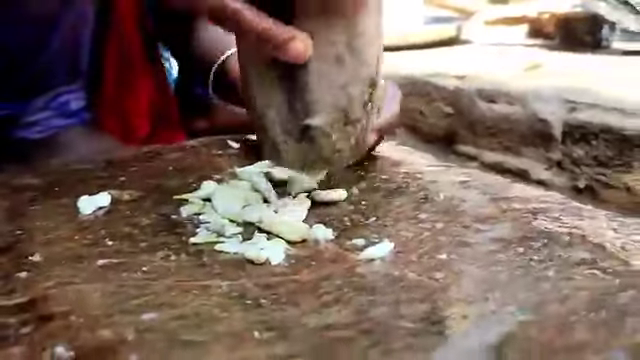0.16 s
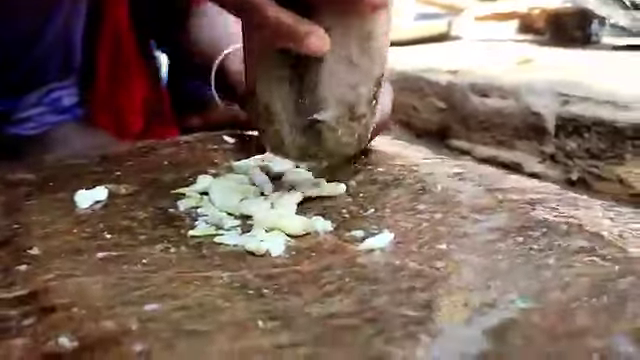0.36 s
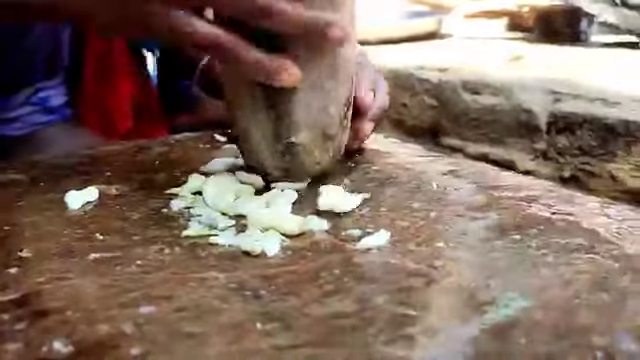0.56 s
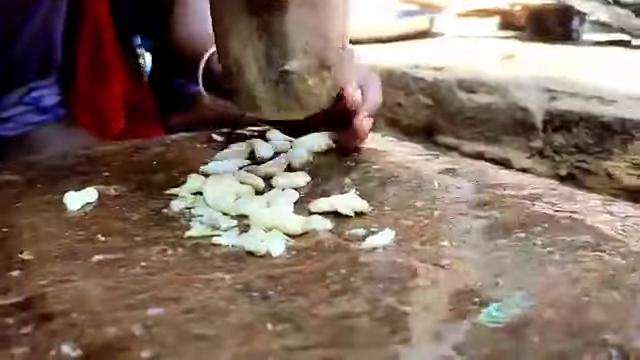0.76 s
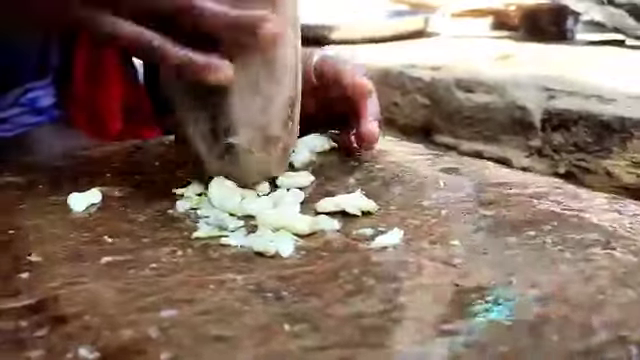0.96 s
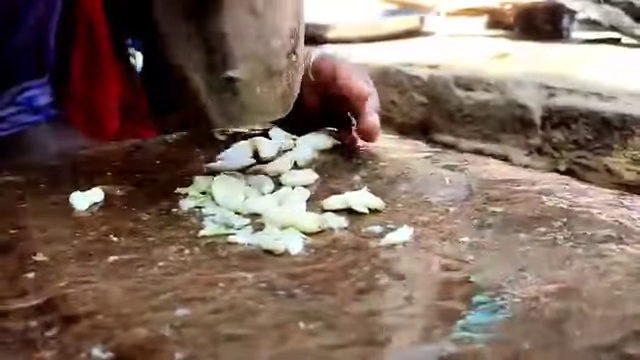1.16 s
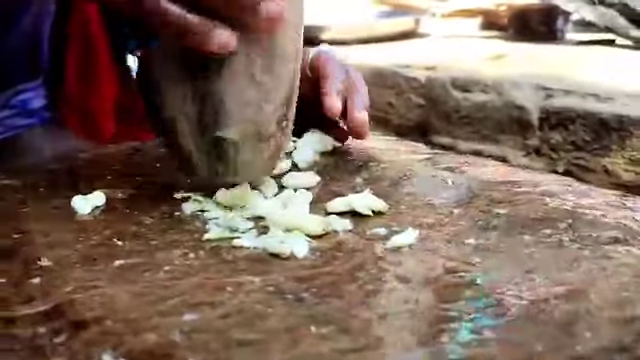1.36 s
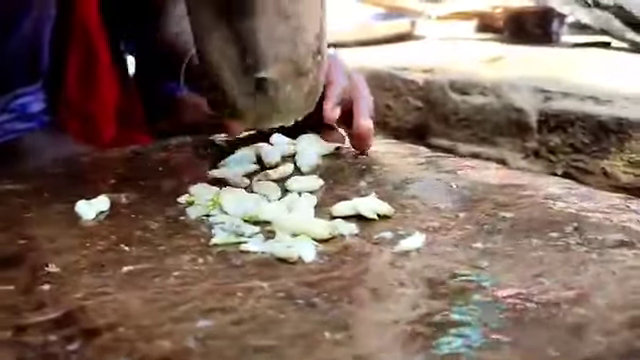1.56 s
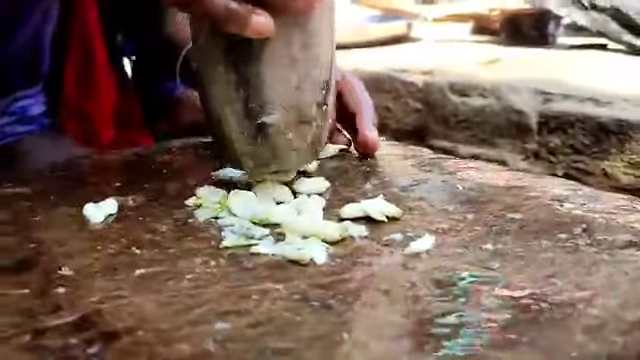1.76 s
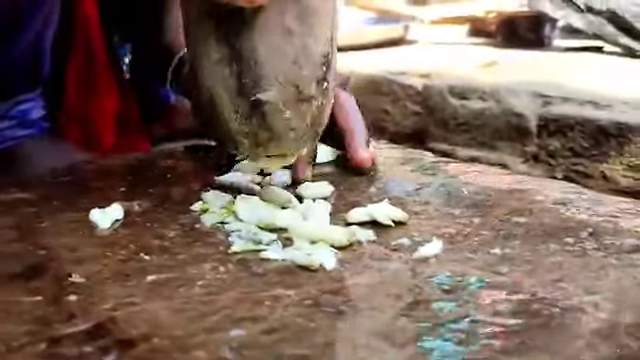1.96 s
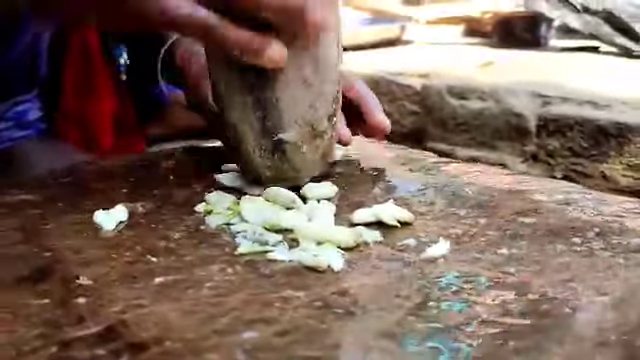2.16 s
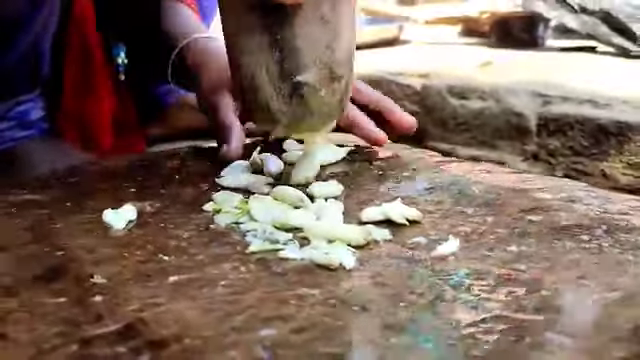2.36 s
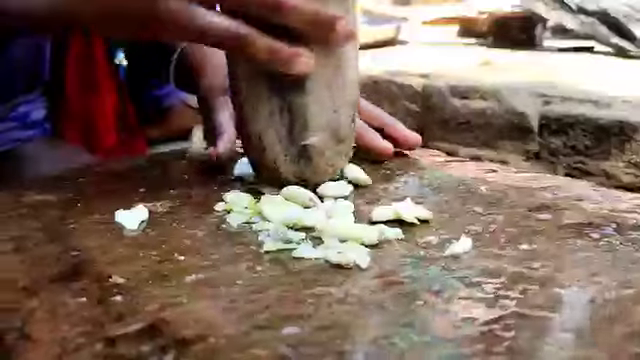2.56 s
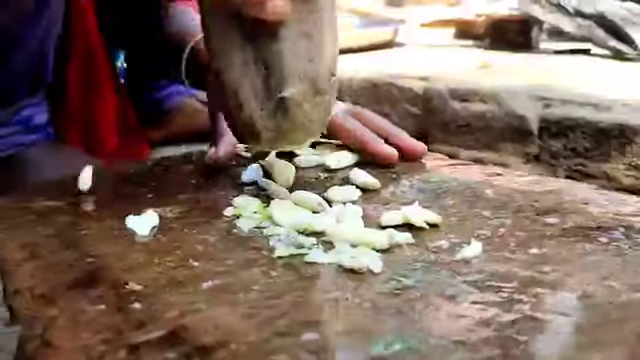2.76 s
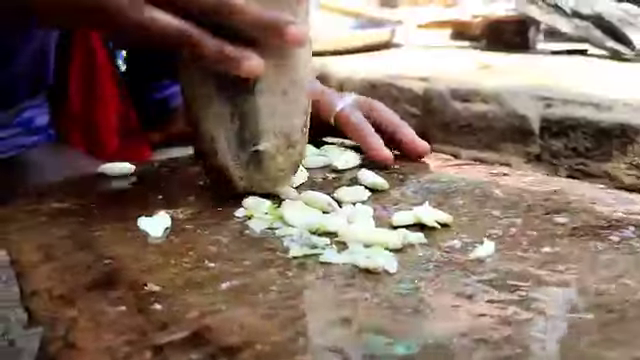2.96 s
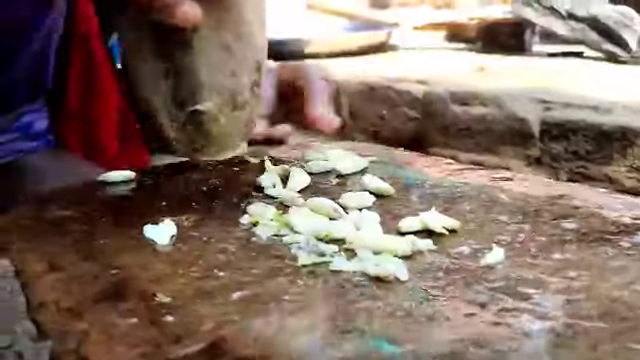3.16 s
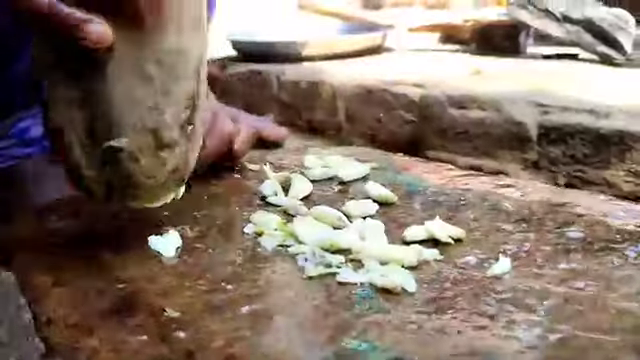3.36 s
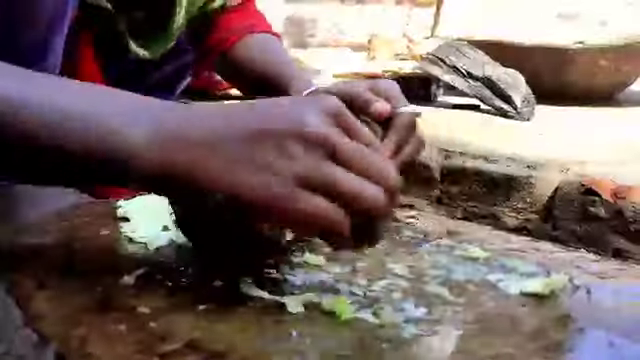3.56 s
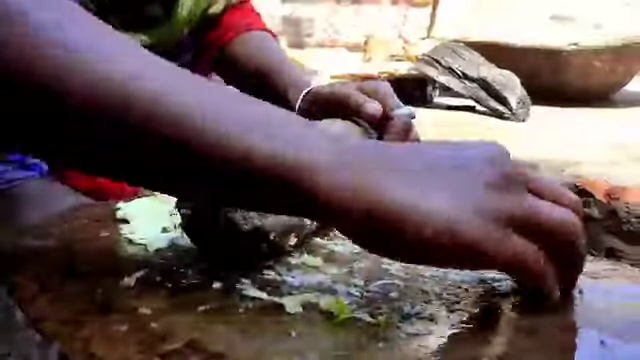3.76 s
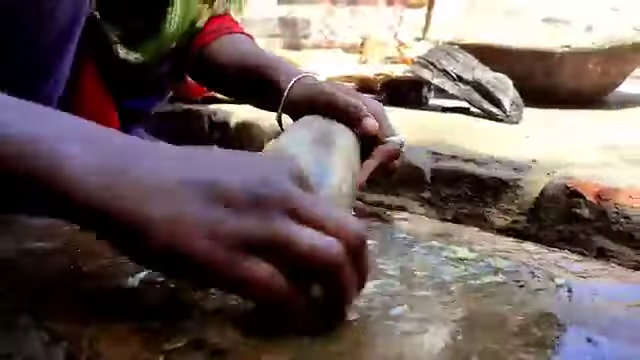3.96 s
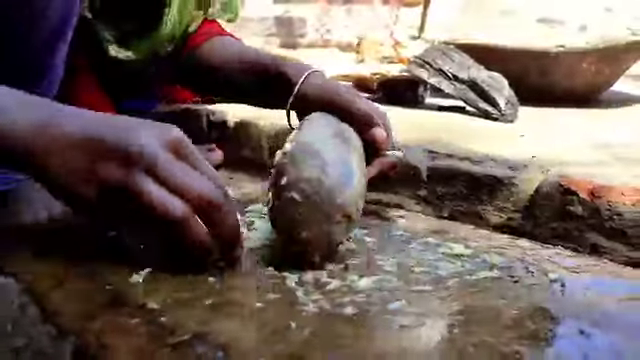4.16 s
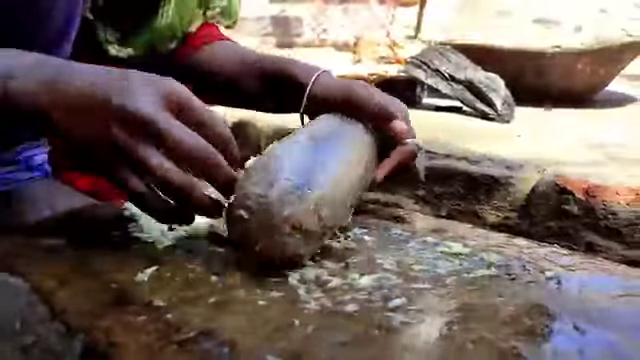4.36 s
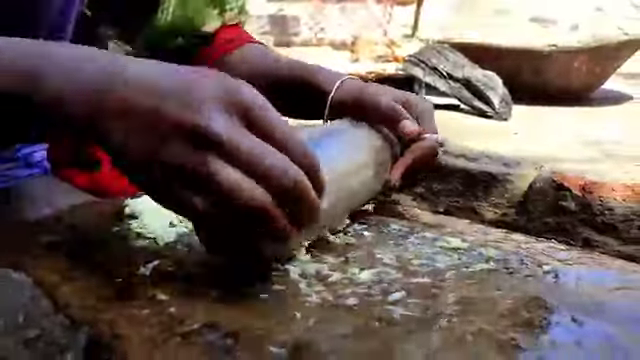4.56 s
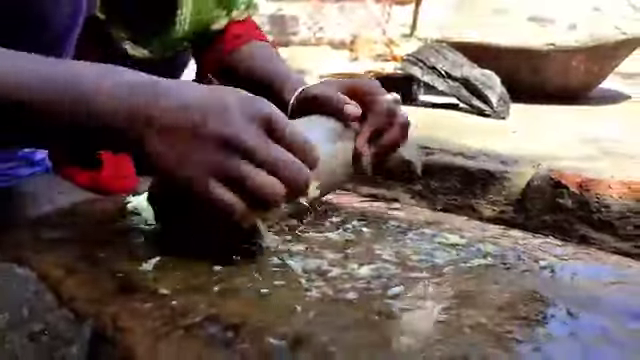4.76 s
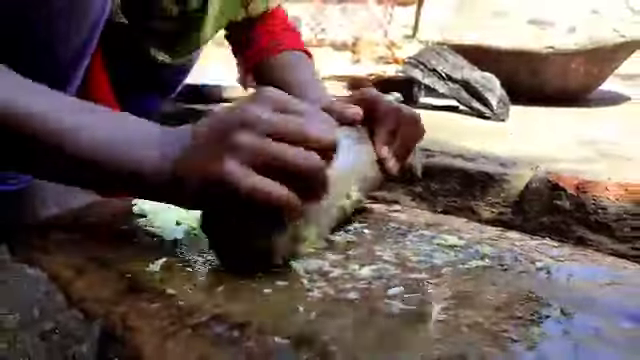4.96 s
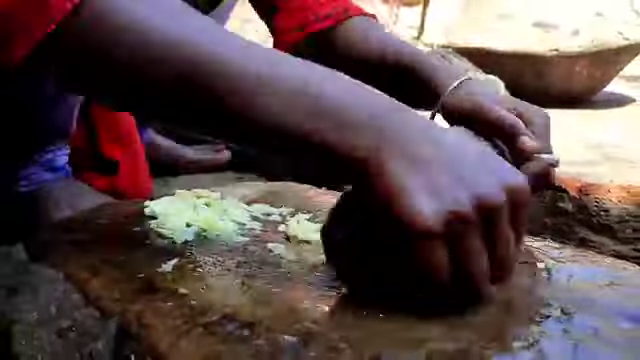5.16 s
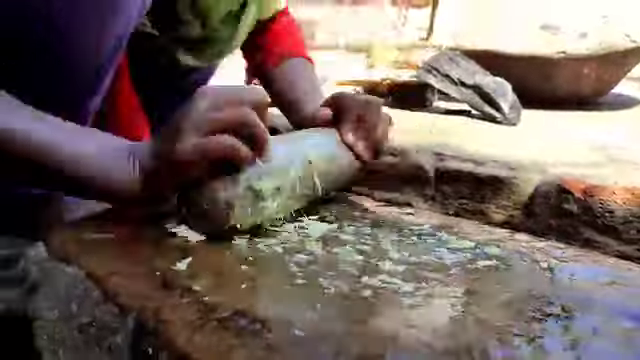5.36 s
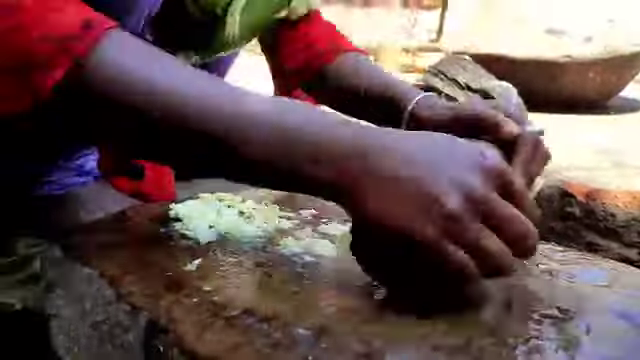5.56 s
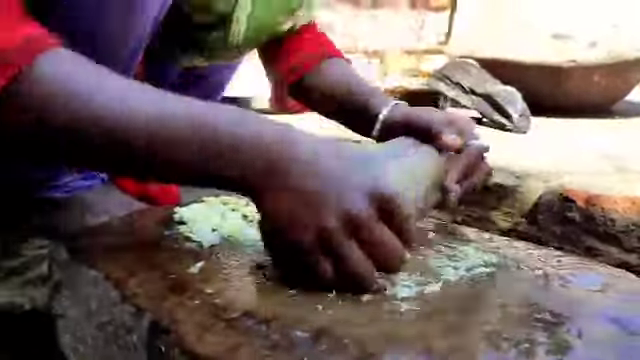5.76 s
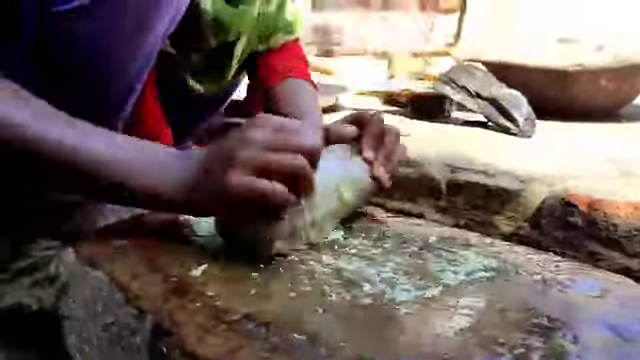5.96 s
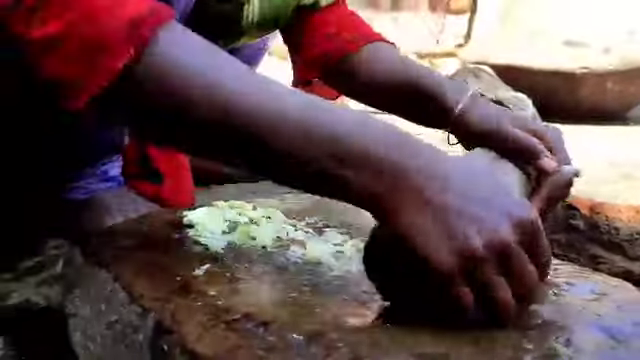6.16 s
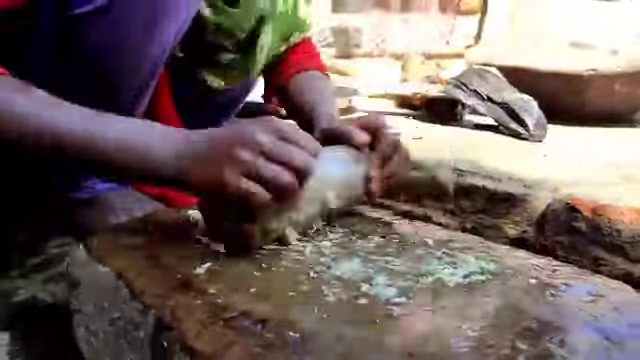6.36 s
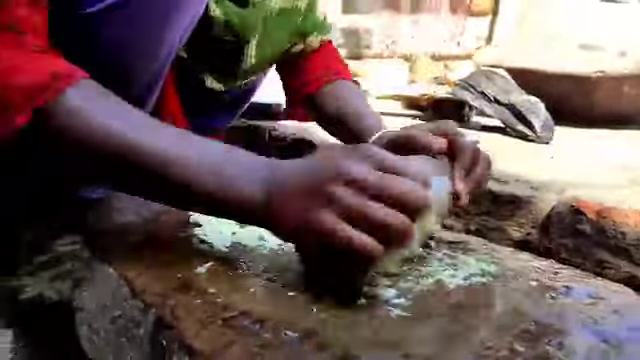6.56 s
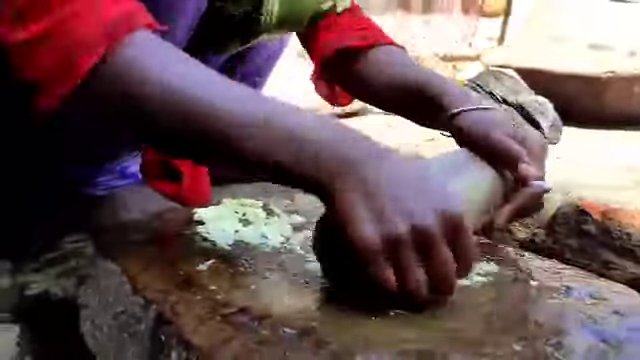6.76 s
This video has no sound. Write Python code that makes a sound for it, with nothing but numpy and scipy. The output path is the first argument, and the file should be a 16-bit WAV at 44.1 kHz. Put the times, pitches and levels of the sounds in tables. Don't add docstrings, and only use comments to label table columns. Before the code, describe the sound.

Nine blows crush garlic on a stone slab: fibres snap sharply, juice squirts, the slab gives a soft low thud. A quieter spell follows, with small scuffs, wet smears and fingers sweeping pulp. From about five seconds the roller clacks hard and briefly rings, each clack leading into a coarse hissing push and lighter pull. Close stereo pickup outdoors, faint wind and one tiny far chirp.

```python
import sys
import numpy as np
from scipy import signal
from scipy.fft import rfft, irfft, next_fast_len
from scipy.io import wavfile

SR = 44100
rng = np.random.default_rng(int(sys.argv[2]) if len(sys.argv) > 2 else 0)


def log_audio(samples):
    frames = np.atleast_2d(samples).T
    limited = np.clip(frames, -1, 1)
    pcm = np.round(limited * 32767).astype(np.int16)
    wavfile.write(sys.argv[1], SR, pcm)


def volts_from_db(level):
    exponent = np.asarray(level, float) / 20
    return 10 ** exponent


N = 300321

# time in seconds, level in dB, left over right in dB.
WIND = [
    (0.0, -56.5, 11),
    (1.29, -63, 3.5),
    (2.07, -66, 9.5),
    (2.29, -64, 11),
    (2.69, -66, -0.5),
    (3.17, -67.5, 3),
    (3.57, -63.5, 1),
    (4.59, -66.5, 8.0),
    (5.73, -68, -0.5),
    (6.81, -68, 12.5),
]
# time in seconds, pitch in Hz, level in dB.
BIRD = [
    (1.293, 5510, -92),
    (1.302, 5000, -72.5),
    (1.318, 4090, -74.5),
    (1.335, 3700, -84),
    (1.35, 3600, -78),
]
# frequency in Hz, density in dB per Hz.
YARD_SPECTRUM = [(29, -31), (50, -1), (174, -14.5), (367, -18.5), (413, -24), (455, -18.5), (578, -22.5),
                 (1080, -27.5), (1160, -27), (1740, -28), (5660, -37), (12500, -42), (14200, -40),
                 (14600, -66.5)]
YARD_DB = -66.5
SWAY_DB = 1.5
PORT_LAG = 4

# start in seconds, peak in dB, crackle centre in Hz,
# mid share in dB, mid centre in Hz.
BURSTS = [(0.0172, -13.5, 7560, -12.5, 3500), (0.3417, -15, 7500, -15, 2430), (0.605, -47, 4490, 6, 1500),
          (0.6648, -16, 7200, -18.5, 2520), (1.0884, -17, 6950, -19.5, 1290),
          (1.43, -11.5, 6086, -18, 2200), (1.771, -15.5, 7120, -9, 3440),
          (2.3131, -25.5, 7100, -12.5, 3840), (2.6681, -10.5, 6760, -16.5, 2320),
          (3.03, -24.5, 6770, -17, 3330), (3.0355, -27, 7100, -2.5, 2756)]
BURST_MS, LONGER_MS_PER_DB = 2.15, 0.11
# start in seconds, peak in dB, mid share in dB, mid centre in Hz.
GIVES = [(0.0176, -20, -8.5, 2280), (0.042, -43, -29, 1830), (0.0474, -35.5, -24, 2920),
         (0.3465, -15.5, -14, 4500), (0.352, -26.5, -11.5, 3720), (0.3703, -30.5, -27, 2450),
         (0.376, -36, -20, 3850), (0.6677, -26, 8.5, 3650), (0.6632, -22.5, -2, 2300),
         (1.086, -36, -24.5, 3600), (1.4321, -31, -1.5, 1505), (1.4742, -40, -18, 2190),
         (1.784, -40.5, -11, 3880), (2.3061, -31.5, -15, 2230), (2.3178, -36, -4, 3000),
         (2.349, -58, -19, 3000), (1.131, -44, -7, 2520), (3.0417, -35, -10, 4000),
         (2.6707, -19, -17, 1630)]
CRACKLE_HZ, GIVE_MS = 7100, 2.5
# start in seconds, peak in dB.
SKINS = [
    (0.74, -59),
    (2.298, -42),
]
# start in seconds, peak in dB.
TICKS = [(0.1535, -72), (0.4194, -64), (0.4304, -61), (0.439, -54.5), (0.4484, -63), (0.455, -60.5),
         (0.4823, -66), (0.7275, -64), (0.7374, -62), (1.918, -60), (2.0138, -70), (2.379, -75),
         (2.81, -60.5)]
# start in seconds, peak in dB.
SNAPS = [(3.52, -40), (4.487, -45), (4.5223, -47.5), (4.578, -50.5), (4.7094, -52), (4.7252, -58),
         (4.7436, -56), (4.7615, -51.5), (4.7915, -55), (4.8384, -54.5), (5.05, -32.5), (5.3917, -42),
         (5.438, -46.5), (5.485, -55.5), (5.4981, -52), (5.5301, -43.5), (5.855, -44), (5.9962, -46.5),
         (6.0736, -46), (6.1712, -42), (5.9017, -44.5), (6.39, -47), (6.4959, -56.5), (6.5868, -50),
         (5.5434, -45.5), (5.5888, -59), (6.0496, -50), (6.3235, -70.5), (6.3463, -54), (6.6053, -44),
         (5.4642, -51), (5.3036, -57), (6.7424, -41), (6.763, -46), (3.637, -53), (3.648, -54.5),
         (4.402, -64.5), (4.498, -50.5), (4.536, -54), (5.375, -51)]
# start in seconds, peak in dB, mid share in dB,
# mid centre in Hz, length in ms.
CRUNCHES = [(.676, -40.5, -14.5, 4000, 2), (0.68, -36, 7, 3580, 7.7), (1.119, -37, -6.5, 6000, 5),
            (.372, -43.5, -2.5, 3490, 5), (1.4625, -46, -3.5, 3005, 6), (2.75, -39, -4, 4500, 9),
            (.40, -57, 2.5, 4500, 7), (0.69, -51, 4, 3985, 5.9), (1.1, -47.5, -6, 7000, 5.5),
            (1.15, -63, 4, 4500, 7.8), (1.45, -46, -3.5, 4000, 5), (3.036, -26.5, 3.5, 11000, 3),
            (.358, -39.5, -0.5, 4500, 6), (0.43, -50.5, 4, 4500, 9), (.70, -46.5, 4.5, 4200, 8)]
# frequency in Hz, density in dB per Hz.
SPLIT_SPECTRUM = [(1470, -53.5), (2500, -23.5), (3140, -21), (4140, -11.5), (5200, -7), (6850, -3),
                  (8230, -10.5), (13400, -15), (14600, -22), (15500, -50)]
# start in seconds, fizz in dB, hold in seconds,
# seeping tail in dB, coarse crunch in dB.
JUICE = [
    (0.027, -64.5, 0.029, -15, -7),
    (0.349, -69.5, 0.018, 5, -14.5),
    (0.675, -66, 0.029, -8.5, -17),
    (1.093, -64, 0.042, -16, -13),
    (1.439, -63.5, 0.042, -23, -13.5),
    (1.776, -67.5, 0.016, -14.5, -2.5),
    (2.313, -70.5, 0.045, -20, -4.5),
    (2.675, -65, 0.04, -9, -8),
    (3.039, -66.5, 0.037, -15, -9),
]
# frequency in Hz, density in dB per Hz.
FIZZ_SPECTRUM = [(530, -47), (900, -24), (3850, -8.5), (5120, -1), (5630, -8), (6900, -6.5), (9070, -22),
                 (13900, -13.5), (14600, -21.5), (15500, -56.5)]
CRUSH_DB_PER_S = 1299
SPRAY_DB, SPRAY_DB_PER_S, DRAIN_DB_PER_S, SEEP_DB_PER_S = 14.5, 2199.5, 703, 111
SWELL_DB_PER_S = 199
# start in seconds, rise in seconds, fall in seconds,
# level in dB, loss during the fall in dB.
PEELS = [
    (.06, .04, .03, -72, 2),
    (1.875, .05, .11, -75, 2),
    (2.32, .02, .08, -74, 8),
]

# start in seconds, peak in dB, frequency in Hz, t60 in seconds, left over right in dB.
PINGS = [(0.343, -53, 500, 0.031, 0), (.664, -30.5, 2260, 0.018, 9.5), (.666, -28.5, 3630, .02, 5),
         (1.09, -51, 520, 0.028, -4), (1.432, -45.5, 600, 0.03, 11.5), (1.432, -42.5, 1470, 0.028, 9.5),
         (1.773, -37, 8760, .008, 5), (2.669, -40, 610, 0.0254, -1), (2.667, -25, 4600, 0.011, 5.5),
         (2.669, -51.5, 1263, 0.046, 0), (2.812, -54.5, 1550, 0.023, 2.5), (3.676, -59, 420, 0.038, -3),
         (4.962, -30, 1900, 0.014, 0), (6.4972, -36.5, 2700, 0.0097, 0), (.465, -60, 5600, .006, -7),
         (.516, -62, 7400, .005, -5), (.6645, -21, 7800, 0.0063, -7), (1.09, -46, 1240, 0.019, -3),
         (5.052, -33, 7170, 0.02, -12.5), (.018, -41, 1260, 0.032, 0), (5.988, -43, 3580, .012, 0),
         (5.1, -43, 930, 0.014, 0), (.684, -43, 4650, .03, -3), (.669, -36, 4700, .01, 0),
         (6, -58, 3600, .008, 0), (5.487, -40, 2870, 0.015, 0), (5.499, -41, 4100, 0.0056, 0),
         (5.592, -42, 3900, .012, 0), (2.7, -59.5, 445, 0.057, 0), (1.1, -64.5, 404, .08, 0),
         (3.14, -62, 430, 0.085, 0), (2.669, -39, 2400, 0.017, 0)]

# start in seconds, peak in dB, push in ms,
# deep ring in dB, upper rings in dB.
THUMPS = [
    (0.020, -40.5, 8, -9, -4.5),
    (0.349, -41.5, 8.5, -10, -8),
    (0.668, -35, 9.1, -16, -8),
    (1.093, -31.5, 6.6, 1.5, -10),
    (1.433, -21, 5.9, -10, -12.5),
    (1.772, -37, 9.5, -9, -10.5),
    (2.315, -51.5, 6.3, -3, -12),
    (2.6706, -21, 4.9, -6.5, -10.5),
    (3.039, -38.5, 9.3, -9, -12),
]
# frequency in Hz, level in dB, t60 in seconds.
BED = [(105, 0.5, 0.1), (145, 3.5, 0.097), (205, -8.5, 0.061), (260, -10, 0.032), (522.5, -11, .05),
       (737, -18.5, 0.09)]

# start in seconds, peak in dB, slab push in dB, contact in ms, roller ring in dB.
KNOCKS = [(0.139, -44.5, -5.5, 1.47, -14), (2.813, -59.5, -7, 0.16, 5.5), (2.883, -65.5, -19, 0.6, 7),
          (2.928, -65, -12, 0.47, 9), (2.99, -57, -17, 0.93, -1), (3.205, -61, -12, 0.69, -15.5),
          (3.486, -64.5, -2, 0.72, -4), (3.676, -58, -12, 0.77, 14), (3.97, -56, -8, 0.76, 4),
          (4.96, -10.5, -11.5, 0.4, 1), (5.056, -25.5, -9.5, 0.6, 5.5), (5.1, -28, -10, 1.17, 15.5),
          (5.126, -47, 2, 0.73, 10.5), (5.49, -33, -3, 1.24, 10), (5.588, -33.5, -3, 1.23, 10.5),
          (5.984, -14, -10, 0.67, 3.5), (6.0765, -25, -4, 0.62, 11.5), (6.497, -17, -9.5, 0.96, 8),
          (6.5268, -22.5, -4, 1.14, 6.5), (6.5864, -28.5, -9, 0.59, 9.5), (6.604, -32, -13, 0.65, -14),
          (6.614, -38, -16, 0.96, 16.5), (6.638, -42.5, -2, 0.69, 9.5), (3.518, -57.5, -1, 0.54, 2),
          (3.551, -60, -7, 0.87, 14), (3.627, -58, -10, 0.81, 7), (3.99, -57, -15, 0.51, 4),
          (4.0945, -62, -12, 0.64, 6), (4.13, -64, -16, 0.55, 5), (4.16, -62, -8, 0.58, 6),
          (4.571, -55, -3, 0.89, 14), (5.671, -65, -13, 0.86, 0.5), (6.011, -41, -7, 0.99, 3),
          (6.11, -42.5, -11, .8, 10), (6.152, -54, -6, 0.67, 10.5), (6.365, -59, -8, 0.63, 6),
          (6.513, -36, -15, 0.71, -4), (6.6765, -55, 4, 0.34, 15.5), (6.5206, -28.5, -4, 1.16, 0),
          (6.5243, -26.5, -6, 1.14, 0)]
# frequency in Hz, left level in dB, right level in dB, t60 in seconds.
CONTACT = [(587, -21, -28, 0.02), (2670, -18, -27, 0.015), (722, -10, -32, 0.05), (834, -4.5, -16, 0.023),
           (971, -4.5, 0.5, 0.018), (1028, -4, -20.5, 0.033), (1536, -5, -10, 0.028),
           (2069, -2, 2.5, 0.011), (2520, -12.5, -21, 0.024)]
# frequency in Hz, left level in dB,
# right level in dB, t60 in seconds.
ROLLER = (1310, -14, 3.5, .0098)
# frequency in Hz, level in dB, t60 in seconds.
SLAB = [(150, -10, 0.052), (168, -13, 0.029), (287, -3, 0.027), (107.4, -22, 0.15), (396, -3.5, 0.02)]

# start in seconds, rise in seconds, fall in seconds,
# hiss in dB, loss during the fall in dB.
NUDGES = [
    (3.511, 0.0096, 0.13, -57.5, 10.5),
    (3.93, 0.042, 0.14, -78, 10),
    (4.45, 0.051, 0.11, -78, 6),
    (4.7, 0.068, 0.013, -70.5, 27),
    (4.76, 0.041, 0.18, -74.5, -2),
]
# as for the nudges, seconds, seconds, seconds, dB, dB.
PULLS = [
    (5.269, 0.13, 0.045, -59, 2.1),
    (5.78, 0.16, 0.056, -59.5, 11.4),
    (6.32, 0.11, 0.06, -57.5, 5.5),
]
# as for the nudges, seconds, seconds, seconds, dB, dB.
PUSHES = [
    (5.023, 0.042, 0.18, -50.5, 22),
    (5.522, 0.07, 0.19, -51, 29.4),
    (6.04, 0.086, 0.15, -53.5, 19.5),
    (6.574, 0.036, 0.17, -48.5, 16),
]
# as for the nudges, seconds, seconds, seconds, dB, dB.
SCUFFS = [
    (4.956, 0.0056, 0.062, -60, 17),
    (5.452, 0.042, 0.0097, -55, 1.96),
    (5.986, 0.011, 0.079, -50, 26),
    (6.494, 0.026, 0.057, -54, 23.5),
]
# as for the nudges, seconds, seconds, seconds, dB, dB.
WIPES = [
    (3.93, 0.39, 0.02, -71, 7),
    (4.4, 0.12, 0.17, -77, 7.5),
    (4.5, 0.1, 0.03, -81.5, 3),
]
# as for the nudges, seconds, seconds, seconds, dB, dB.
SMEARS = [
    (3.6, 0.062, 0.045, -73, 7),
    (4.1, .19, .04, -71, -1),
]
SMEAR_HZ = 5400
NUDGE_TILT_DB, PULL_TILT_DB, PUSH_TILT_DB, SCUFF_TILT_DB, WIPE_TILT_DB = -4.5, -4, -8, -9.5, -6
STOP_DB_PER_S = 895
# frequency in Hz, density in dB per Hz.
GRIT_SPECTRUM = [(240, -52), (400, -8), (425, -11.5), (459, -23), (643, -14.5), (784, -16.5), (1280, -17),
                 (1960, -9.5), (7670, 2), (14100, -4.5), (14700, -36)]
PATCHY_DB, STREAKY_DB = 2.2, 1.6
# start in seconds, length in seconds, roller drone in dB,
# slab rumble in dB, loss in dB.
STROKES = [(3.51, 0.19, -66.5, -60, 8.5), (3.955, 0.23, -72.5, -74, 6), (4.565, 0.055, -59.5, -62.5, 3.5),
           (4.736, 0.063, -66.5, -66.5, 1), (4.963, 0.072, -58, -55, 7.5),
           (5.064, 0.091, -51.5, -45.5, 11.5), (5.582, 0.12, -53, -46, 26.5),
           (5.972, 0.11, -66.5, -46.5, 16), (6.11, 0.12, -58.5, -47, 21.5), (6.5, 0.026, -49, -44, 7),
           (6.598, 0.036, -49, -43.5, 6), (6.649, 0.069, -52.5, -51, 16)]
BEAR_S = 0.0083
PULL_DRONE_DB, PULL_RUMBLE_DB = -17, -6.5
# frequency in Hz, level in dB, t60 in seconds.
DRONE = [(1290, 10.5, 0.045), (1499, 10.5, 0.046), (741, 1.5, 0.056), (950, -25.5, 0.025)]
# frequency in Hz, level in dB, t60 in seconds.
RUMBLE = [(169, 5.5, 0.081), (198.4, 6, 0.044), (286, -13, 0.033)]


def rms_one(x):
    return x / np.sqrt(np.mean(x ** 2) + 1e-20)


def in_time(rows):
    s, *columns = np.transpose(rows)
    return [np.interp(np.arange(N) / SR, s, c, left=-140, right=-140) for c in columns]


def colour(x, spectrum):
    size = next_fast_len(x.shape[-1])
    hz, level_db = np.transpose(spectrum)
    log_hz = np.log(np.fft.rfftfreq(size, 1 / SR) + 1)
    shape = volts_from_db(np.interp(log_hz, np.log(hz), level_db, left=-70, right=-70))
    return rms_one(irfft(rfft(x, size) * shape, size)[..., :x.shape[-1]])


def band(x, low_hz, high_hz):
    sos = signal.butter(2, [low_hz, min(high_hz, .45 * SR)], "band", fs=SR, output="sos")
    return signal.sosfilt(sos, x)


def ring(x, hz, t60):
    r, w = volts_from_db(-60 / (t60 * SR)), 2 * np.pi * hz / SR
    return signal.lfilter([0, np.sin(w)], [1, -2 * r * np.cos(w), r * r], x + 1e-18)


def drift(hz):
    r = np.exp(-2 * np.pi * hz / SR)
    return rms_one(signal.lfilter([1], [1, -2 * r, r * r], rng.standard_normal(N + SR))[SR:])


def grains(size, per_s, spread_db):
    sizes = volts_from_db(spread_db * np.minimum(rng.exponential(1, size), 5)) * rng.choice([-1, 1], size)
    return sizes * (rng.random(size) < per_s / SR)


def pan(pan_db):
    return volts_from_db(np.array([[.5], [-.5]]) * pan_db)


def ports(shared, own, own_db, pan_db):
    pair = np.array([shared, np.roll(shared, PORT_LAG)]) + volts_from_db(own_db) * own
    return pair * pan(pan_db)


def add(out, sound, s):
    i = max(round(s * SR), 0)
    out[:, i:i + sound.shape[-1]] += sound[..., :N - i]


def yard():
    air = colour(rng.standard_normal((3, N)), YARD_SPECTRUM)
    hum = band(air[2], 61, 700) * volts_from_db(2.2 * drift(4))
    wind_db, pan_db = in_time(WIND)
    gusts = [rms_one(band(rng.standard_normal(N), 12, 46) * volts_from_db(1.5 * drift(5))) for port in (0, 1)]
    wind = volts_from_db(wind_db + 2) * pan(pan_db) * np.array(gusts)
    buffeting = rng.standard_normal((2, N)) + 1.5 * air[2] / air[2].std()
    wind += volts_from_db(wind_db - 8.5 + 2.5 * drift(4)) * rms_one(band(buffeting, 28, 100))
    wind += volts_from_db(wind_db + SWAY_DB) * rms_one(band(rng.standard_normal(N), 5, 20))
    pitch_hz, bird_db = in_time(BIRD)
    bird = volts_from_db(bird_db) * np.sin(2 * np.pi * np.cumsum(pitch_hz) / SR)
    return volts_from_db(YARD_DB + 1.0) * air[:2] + volts_from_db(YARD_DB - 5.0) * hum + wind + bird


def crackle(centre_hz, narrow_db, mid_hz, mid_db, length_ms, lead_ms, split=3.0):
    ms = np.arange(1400) / SR * 1000 - 6
    shape = np.where(ms < 0, np.exp(ms / lead_ms), np.exp(-np.maximum(ms, 0) / max(length_ms, .2)))
    snaps = grains((3, 1400), 12000, 2.3) * shape
    snaps[0, round(.006 * SR)] += split * np.abs(snaps[0]).max()
    mid = rms_one(band(snaps, mid_hz * 0.41, mid_hz * 1.9))
    broad = colour(snaps, SPLIT_SPECTRUM) + volts_from_db(mid_db) * mid
    narrow = volts_from_db(narrow_db) * rms_one(band(snaps, centre_hz * .88, centre_hz * 1.092))
    pair = ports(broad[0], broad[1:], 1, -2.9) + ports(narrow[0], narrow[1:], 2.8, -3.5)
    pair = pair * signal.windows.tukey(1400, .35)
    return pair / np.abs(pair).max()


def splitting():
    out = np.zeros((2, N))
    lead = .005
    for s, peak_db, centre_hz, mid_db, mid_hz in BURSTS:
        length_ms = BURST_MS + LONGER_MS_PER_DB * (-10.0 - peak_db)
        add(out, volts_from_db(peak_db + 2.0) * crackle(centre_hz, 0.3, mid_hz, mid_db, length_ms, 1.8), s - lead)
    for s, peak_db, mid_db, mid_hz in GIVES:
        add(out, volts_from_db(peak_db + 2) * crackle(CRACKLE_HZ, 0.055, mid_hz, mid_db, GIVE_MS, 0.49), s - lead)
    for s, peak_db in SKINS:
        add(out, volts_from_db(peak_db) * crackle(4000, 0, 2300, -1.5, 1.8, 0.72), s - lead)
    for s, peak_db in TICKS:
        add(out, volts_from_db(peak_db + 11.5) * crackle(7500, 0.84, 2500, -35.0, 0.62, 0.74), s - lead)
    for s, peak_db in SNAPS:
        add(out, volts_from_db(peak_db + 8) * crackle(9500, -15, 8500, 1, 0.4, 0.4), s - lead)
    for s, peak_db, mid_db, mid_hz, length_ms in CRUNCHES:
        collapse = crackle(CRACKLE_HZ, -6, mid_hz, mid_db, length_ms, 3.0, split=0)
        add(out, volts_from_db(peak_db) * collapse, s - lead)
    return out


def flow(s, db, hold_s, tail_db):
    early = np.minimum(np.arange(N) / SR - s, 0)
    t = np.maximum(np.arange(N) / SR - s, 0)
    spray = volts_from_db(SPRAY_DB - SPRAY_DB_PER_S * t)
    held = volts_from_db(np.minimum(SWELL_DB_PER_S * (t - hold_s), -DRAIN_DB_PER_S * (t - hold_s)))
    seep = volts_from_db(tail_db - SEEP_DB_PER_S * t)
    return volts_from_db(db + CRUSH_DB_PER_S * early) * (spray + held + seep)


def slide(s, rise_s, fall_s, db, loss_db):
    t = np.arange(N) / SR - s - rise_s
    fall_db = loss_db * np.clip(t / fall_s, 0, 1) + STOP_DB_PER_S * np.maximum(t - fall_s, 0)
    return np.sin(np.pi / 2 * np.clip(1 + t / rise_s, 0, 1)) * volts_from_db(db - fall_db)


def slides(rows):
    return sum(slide(*row) for row in rows)


def juice():
    fizz = colour(grains((3, N), 3500, 3.2) * volts_from_db(2 * drift(40)), FIZZ_SPECTRUM)
    crunch = rms_one(band(grains((3, N), 2500, 7.4) * volts_from_db(3.5 * drift(60)), 450, 4500))
    threads = rms_one(band(grains((3, N), 1500, 4) * volts_from_db(4 * drift(50)), 6200, 8000))
    fizz_gain, crunch_gain = np.zeros(N), np.zeros(N)
    for *blow, crunch_db in JUICE:
        wet = flow(*blow)
        fizz_gain += wet
        crunch_gain += volts_from_db(crunch_db) * wet
    out = fizz_gain * ports(fizz[0], fizz[1:], -2.2, -4)
    out += crunch_gain * ports(crunch[0], crunch[1:], 0.99, -1.5)
    return out + slides(PEELS) * ports(threads[0], threads[1:], -3.5, -6)


def pings():
    out = np.zeros((2, N))
    for s, peak_db, hz, t60, pan_db in PINGS:
        snaps = grains(2000, 3000, 2.0) * volts_from_db(-60 * np.arange(2000) / SR / 0.0033) * volts_from_db(-5.5)
        snaps[0] = 1
        ping = band(ring(snaps, hz, t60), hz * 0.53, hz * 1.4)
        add(out, volts_from_db(peak_db) * ports(ping / np.abs(ping).max(), 0, 0, pan_db), s)
    return out


def thumps():
    out, t = np.zeros((2, N)), np.arange(SR // 4) / SR
    for s, peak_db, push_ms, deep_db, upper_db in THUMPS:
        turn = t * 1000 / np.clip(push_ms, 2, 15)
        push = np.sin(2 * np.pi * turn) * volts_from_db(-9 * turn - 30 * np.maximum(turn - 1, 0))
        push *= np.minimum(t / 0.0022, 1)
        shares_db = np.r_[deep_db, upper_db + 2.0 * rng.standard_normal(len(BED) - 1)]
        swing = np.zeros(len(t))
        for share_db, (hz, db, t60) in zip(shares_db, BED):
            swing += volts_from_db(db + share_db - 60 * t / t60) * np.sin(2 * np.pi * hz * t)
        shudder = rms_one(band(rng.standard_normal(len(t)), 60, 270)) * volts_from_db(upper_db - 8.5 - 60 * t / 0.1)
        thump = volts_from_db(peak_db) * (push + (swing + shudder) * np.minimum(t / 0.011, 1))
        add(out, np.array([thump, np.roll(thump, 12)]), s)
    return out


def stone(contact, roller, slab):
    out = np.zeros((2, N))
    for force, (hz, left_db, right_db, t60) in zip(contact, CONTACT):
        out -= ring(force, hz, t60) * volts_from_db(np.array([[left_db], [right_db]]))
    hz, left_db, right_db, t60 = ROLLER
    decay = np.log(1000) / (t60 * SR)
    swell = ring(ring(ring(roller, hz, t60), hz, t60), hz, t60)
    swell *= 2 * (np.e * decay) ** 2
    out += swell * volts_from_db(np.array([[left_db], [right_db]])) * [[-1], [1]]
    out = band(band(out, 500, 6000), 260, 6000)
    return out + band(sum(volts_from_db(level_db) * ring(slab, hz, t60) for hz, level_db, t60 in SLAB), 120, 770)


def knocks():
    force = np.zeros((2 + len(CONTACT), N))
    for s, peak_db, push_db, contact_ms, ring_db in KNOCKS:
        pulse = np.hanning(int(np.clip(contact_ms, .1, 3) * SR / 1000) + 3)
        chatter = grains(2000, 830, 3.0) * volts_from_db(-33.0 - 60 * np.arange(2000) / SR / 0.17)
        chatter[0] = 1
        hit = np.convolve(chatter, pulse / pulse.sum())
        shares_db = np.r_[ring_db, push_db, 2.5 * rng.standard_normal(len(CONTACT))]
        add(force, volts_from_db(peak_db - 2.5 + shares_db[:, None]) * hit, s - .0006)
    return stone(force[2:], force[0], force[1])


def rubbed(modes, per_s, pan_db):
    slips = grains((3, N), per_s, 3.5) * volts_from_db(2.5 * drift(35))
    ringing = sum(volts_from_db(level_db) * ring(slips, hz, t60) for hz, level_db, t60 in modes)
    sound = rms_one(band(ringing, 96, 2500))
    return ports(sound[0], sound[1:], -15.0, pan_db)


def gritty(tilt_db):
    grit = colour(grains((3, N), 8000, 3.4) * volts_from_db(0.9 * drift(40) + 1.5 * drift(180)), GRIT_SPECTRUM)
    edges = np.geomspace(400, 16000, 36)
    slopes = np.clip(np.log2(edges[1:] / 6000), -.5, .5)
    out, sign = np.zeros((3, N)), 1
    for slope, low_hz, high_hz in zip(slopes, edges, edges[1:]):
        patch_db = PATCHY_DB * drift(45) + STREAKY_DB * drift(7.2) + slope * tilt_db
        out += sign * volts_from_db(patch_db) * band(grit, low_hz, high_hz)
        sign = -sign
    return out


def grinding():
    kinds = [slides(rows) for rows in (NUDGES, PULLS, PUSHES, SCUFFS, WIPES)]
    speed, pull = sum(kinds), kinds[1]
    tilts_db = [NUDGE_TILT_DB, PULL_TILT_DB, PUSH_TILT_DB, SCUFF_TILT_DB, WIPE_TILT_DB]
    grit = gritty(np.dot(tilts_db, kinds) / (speed + 1e-9))
    hiss = speed * ports(grit[0], grit[1:], 0.9, -3.0)
    smear = rms_one(band(grit, SMEAR_HZ / 1.57, SMEAR_HZ * 1.65))
    hiss += slides(SMEARS) * ports(smear[0], smear[1:], 0.79, -2.0)
    drone, rumble = volts_from_db(PULL_DRONE_DB) * pull, volts_from_db(PULL_RUMBLE_DB) * pull
    for s, length_s, drone_db, rumble_db, loss_db in STROKES:
        drone += slide(s, BEAR_S, length_s, drone_db, loss_db)
        rumble += slide(s, BEAR_S, length_s, rumble_db, loss_db)
    return hiss + drone * rubbed(DRONE, 2200, -7.0) + rumble * rubbed(RUMBLE, 2000, -0.33)


def walls(x):
    dull = band(x, 220, 6000)
    out = np.zeros((2, N))
    for lags in (rng.uniform(0.0017, 0.06, (14, 2)) * SR).astype(int):
        for port, lag in enumerate(lags):
            out[port] += np.roll(dull[port], lag) * volts_from_db(-60 * lag / SR / 0.2)
    return out


def scene():
    work = splitting() + juice() + pings() + thumps() + knocks() + grinding()
    return work + volts_from_db(-28.5) * walls(work) + yard()


def roll_off(x):
    return signal.sosfilt(signal.butter(12, 15660, fs=SR, output="sos"), x)


def record(dry):
    above = np.clip((np.fft.rfftfreq(N, 1 / SR) - 14250) / 250, 0, 1)
    mix = irfft(rfft(dry) * volts_from_db(-14 * above), N)
    return roll_off(mix)


dry = scene()
out = record(dry)
log_audio(out)
```